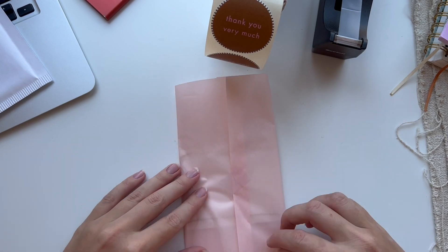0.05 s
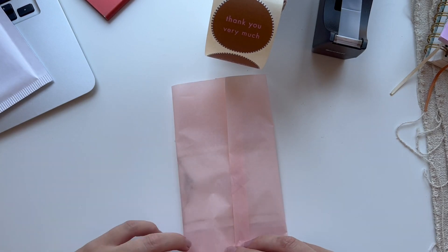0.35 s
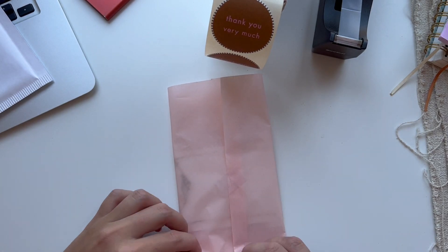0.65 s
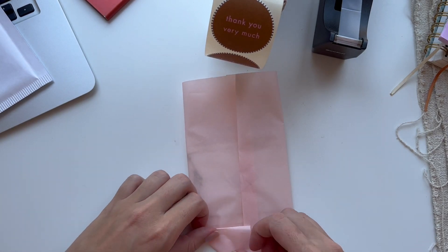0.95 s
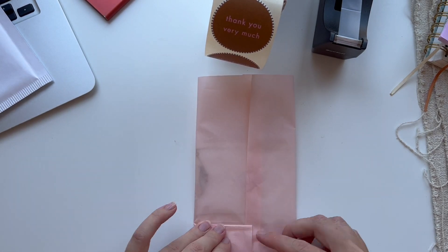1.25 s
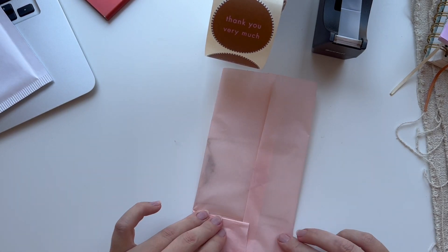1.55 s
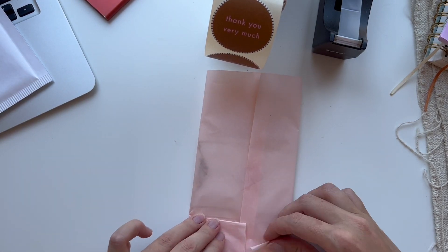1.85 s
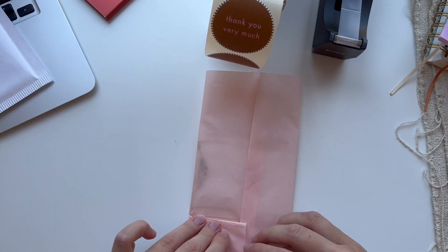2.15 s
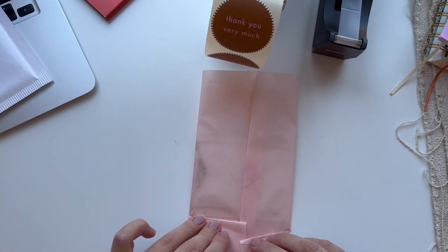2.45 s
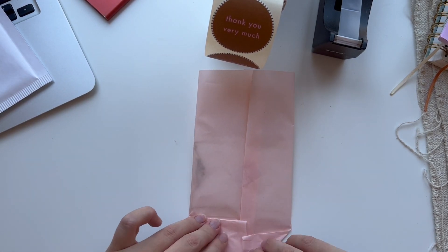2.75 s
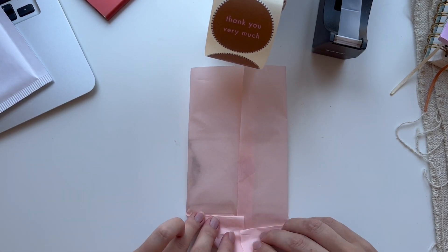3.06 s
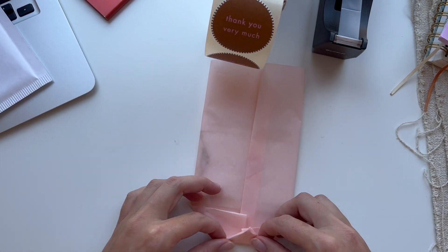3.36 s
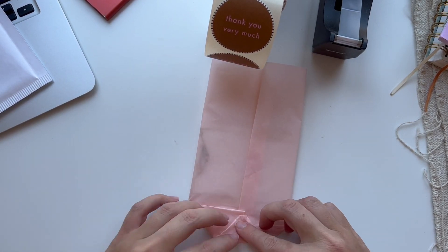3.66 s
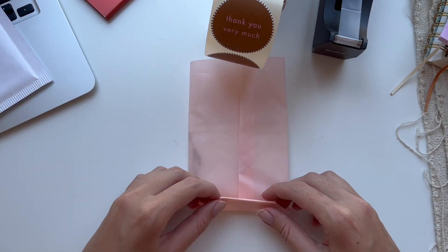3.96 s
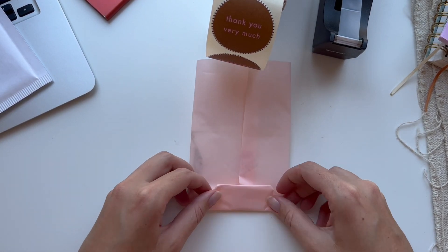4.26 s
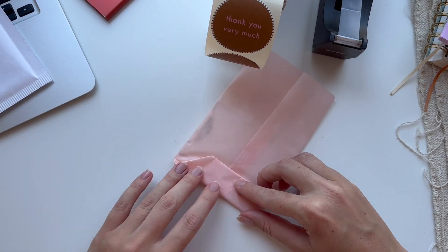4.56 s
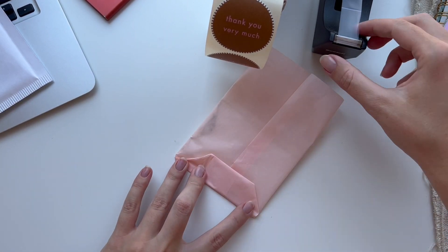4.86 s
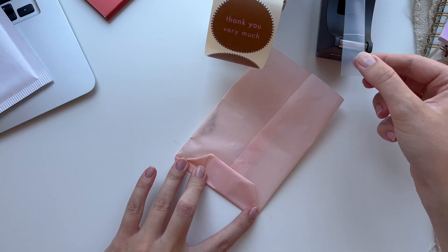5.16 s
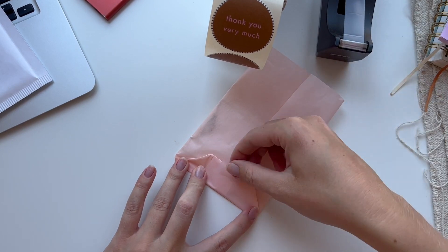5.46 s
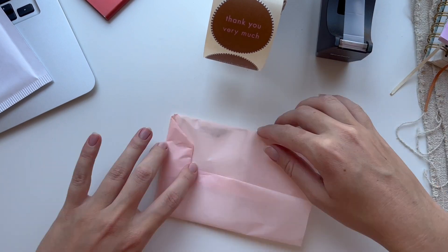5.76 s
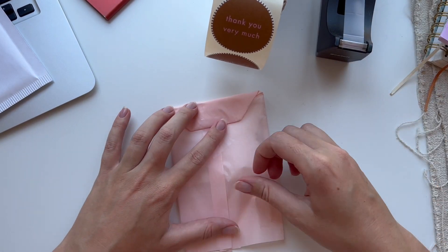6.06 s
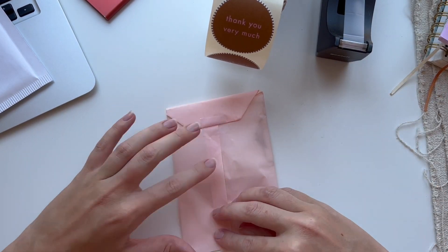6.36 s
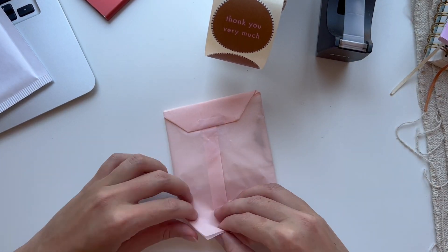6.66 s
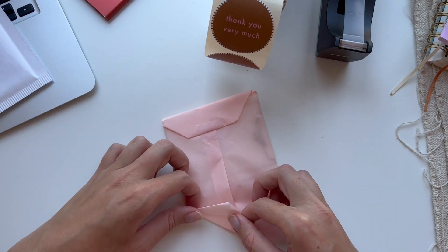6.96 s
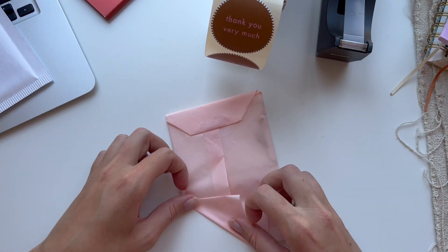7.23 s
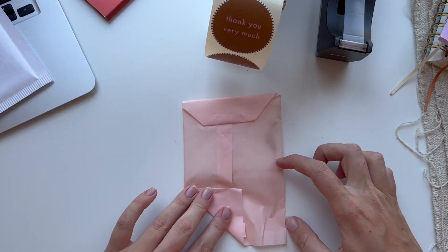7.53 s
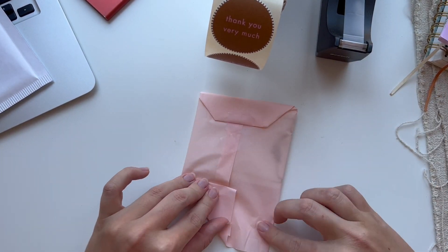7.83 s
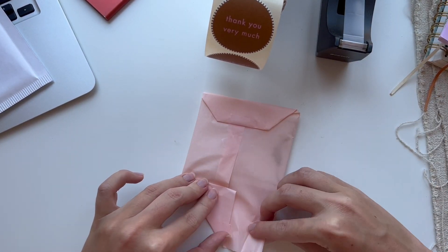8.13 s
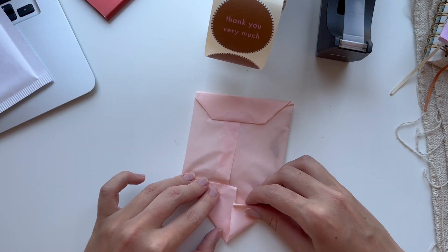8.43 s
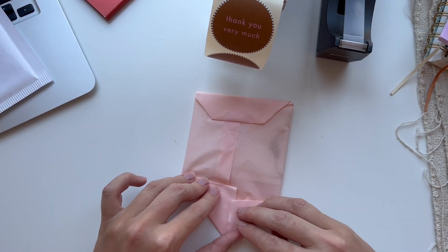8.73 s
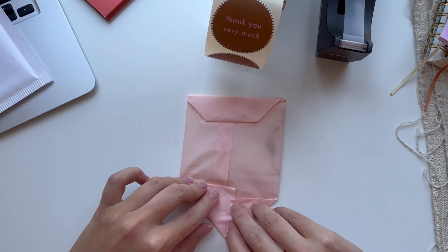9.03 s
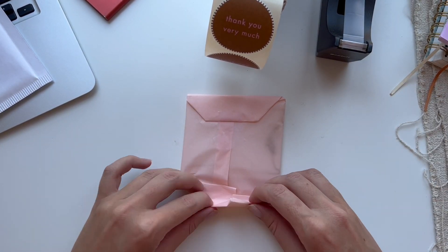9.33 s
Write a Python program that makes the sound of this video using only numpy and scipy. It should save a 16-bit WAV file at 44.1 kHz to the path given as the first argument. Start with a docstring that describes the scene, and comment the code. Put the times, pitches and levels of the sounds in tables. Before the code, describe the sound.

Thin tissue paper rustles, crinkles and snaps as it is folded on a desk, with a few dull bumps over a low hum.

```python
"""Hands fold and crease thin tissue paper on a desk in a small room filled with a low, throbbing hum.
From the start the sheet hisses by friction, and crackles, snaps and ticks as it buckles. The desk is
scuffed at 0.7 s and bumped at 1.3 s, when something hollow rocks on it. From 2.4 s a sliding finger
rasps now and then. Just after 5 s tape peels off its roll and is torn on a ringing cutter. The folding
goes on to the end, with its loudest snaps and more bumps and ringing scuffs between 6.7 and 8 s."""
import sys
import numpy as np
from scipy import signal
from scipy.fft import rfft, irfft, next_fast_len
from scipy.io import wavfile
from scipy.ndimage import uniform_filter1d

SR = 44100
rng = np.random.default_rng(int(sys.argv[2]) if len(sys.argv) > 2 else 0)


def generate_wav(signal):
    """Clip the signal to [-1, 1] and save it as 16-bit WAV at the path in sys.argv[1]."""
    frames = np.transpose(np.atleast_2d(signal))
    scaled = np.clip(frames, -1, 1) * 32767
    pcm = np.round(scaled).astype(np.int16)
    wavfile.write(sys.argv[1], SR, pcm)


N = 418509
TIME = np.arange(N) / SR
BAND_LIMIT_HZ = 15900


def amp(db):
    """Converts decibels to an amplitude ratio."""
    return 10 ** (np.asarray(db) / 20)


def unit(x):
    """Normalises to rms 1."""
    return x / np.sqrt(np.mean(x ** 2) + 1e-20)


def peak_unit(x):
    """Normalises each channel so that its loudest 2 ms have rms 1."""
    return x / np.sqrt(uniform_filter1d(x ** 2, size=88).max(axis=1, keepdims=True))


def at_hz(points, hz):
    """Interpolates a table on a log-frequency axis."""
    knots_hz, values = np.transpose(points)
    return np.interp(np.log(hz + 1), np.log(knots_hz + 1), values)


def envelope(points):
    """Amplitude at every sample, from points of (time [s], level [dB])."""
    return amp(np.interp(TIME, *np.transpose(points)))


def add(mix, start, sound):
    """Superposes a sound on the mix from a start time in seconds."""
    part = mix[:, max(round(start * SR), 0):][:, :sound.shape[-1]]
    part += sound[..., :part.shape[1]]


def filtered(x, response):
    """Multiplies the spectrum of x by a frequency response."""
    size = next_fast_len(x.shape[-1] + 256)
    return irfft(rfft(x, size) * response(np.fft.rfftfreq(size, 1 / SR)), size)[..., :x.shape[-1]]


def coloured(x, spectrum):
    """Filters x by a tabulated spectrum and normalises to rms 1."""
    return unit(filtered(x, lambda hz: amp(at_hz(spectrum, hz))))


def drift(rate_hz):
    """Low-pass Gaussian noise: a random fluctuation of rms 1."""
    clock = TIME[::SR // 2000]
    hz = np.fft.rfftfreq(len(clock), clock[1])
    slow = irfft(rfft(rng.standard_normal(len(clock))) * np.exp(-(hz / rate_hz) ** 2), len(clock))
    return np.interp(TIME, clock, unit(slow))


def stroke(clock, start, length, db, rise_s, sag_db, release_s):
    """Envelope of one hand movement: linear attack, sagging hold, exponential release."""
    t = clock - start
    attack = np.clip(t / min(rise_s, length), 0, 1)
    hold = amp(db - sag_db * np.clip(t / length, 0, 1))
    return attack * hold * np.exp(-np.clip((t - length) / release_s, 0, 20))


# Slow swell of the hum: (time [s], level [dB])
HUM_LEVEL = [(0.0, -30), (0.21, -29.5), (0.37, -43.5), (0.79, -24), (0.9, -40), (1.4, -28), (1.45, -39.5),
             (1.77, -30), (1.88, -49), (2.01, -27), (2.56, -29.5), (2.7, -48), (2.72, -37), (3.01, -42),
             (3.09, -27), (3.44, -37.5), (3.52, -25), (3.57, -35), (4.28, -38.5), (4.65, -31.5),
             (4.76, -42.5), (4.97, -26), (5.02, -37), (5.2, -28.5), (5.34, -34.5), (6.08, -29.5),
             (6.37, -52), (6.45, -29), (6.63, -42.5), (6.82, -33.5), (8.38, -33.5), (8.72, -44.5),
             (8.83, -29), (9.06, -38.5), (9.22, -27), (9.49, -50)]
# Spectrum of the steady room noise: (frequency [Hz], relative level [dB])
ROOM_NOISE = [(15, -30), (30, -7.5), (48, 3.5), (80, 3.5), (95, -1), (112, 7.5), (128, -2.5), (165, -1.5),
              (200, -7), (280, -9), (500, -12), (900, -19.5), (3000, -36), (16000, -53)]


def hum(pitch_hz=64.04, throb_hz=7.3, flutter_hz=12):
    """Narrow-band noise: rumble in one low resonance wavers in amplitude and phase, over room noise."""
    throb = drift(throb_hz) + 1j * drift(throb_hz)
    throb += amp(-14) * (drift(flutter_hz) + 1j * drift(flutter_hz))
    throb /= (1 + abs(throb) ** 2) ** 0.47  # the strongest throbs level off
    tone = unit((throb * np.exp(2j * np.pi * pitch_hz * TIME)).real)
    return envelope(HUM_LEVEL) * tone + amp(-41) * coloured(rng.standard_normal((2, N)), ROOM_NOISE)


# Fingers keep the sheet gently moving: (start [s], duration [s], level [dB], treble tilt [dB])
GENTLE_HOLDS = [(0, 0.3, -44.5, -6.5), (0.385, 0.9, -47, -7), (1.37, 0.15, -58, -12),
                (1.68, 0.32, -52, -7.5), (2.063, 0.46, -51, -7), (2.722, 0.06, -53.5, -6),
                (2.938, 0.37, -48.5, -8.5), (3.387, 1.22, -49.5, -7.5), (4.653, 0.11, -47.5, -12),
                (4.904, 0.044, -47, -10), (5.259, 0.033, -44, -8), (5.491, 0.56, -45, -11),
                (6.124, 0.32, -47, -7.5), (6.548, 0.062, -45.5, -6), (6.679, 0.56, -46.5, -8),
                (7.324, 0.4, -52, -9), (7.985, 0.47, -47, -10), (8.528, 0.44, -49, -5.5),
                (9.014, 0.34, -47.5, -9.5), (9.398, 0.021, -44, -6.5)]
# Pushes, dull if sliding, crisp if bending: (start [s], duration [s], level [dB], treble tilt [dB])
FOLDING_PUSHES = [(0, 0.21, -43.5, -8.5), (.443, 0.092, -41.5, -3), (.542, 0.051, -32.5, -5.5),
                  (.697, 0.092, -40.5, -6.5), (.872, 0.071, -42.5, -10), (.958, 0.039, -38.5, -2),
                  (1.037, 0.12, -38.5, -5), (1.37, 0.14, -43, -8), (1.491, .13, -41, -7.5),
                  (1.658, 0.069, -43.5, -5.5), (1.827, 0.13, -44.5, -5), (2.108, 0.048, -44.5, -1),
                  (2.225, 0.035, -43, -12), (2.3, 0.077, -44, -6), (2.385, 0.089, -39, -4.5),
                  (2.969, 0.14, -39, -7), (3.222, 0.065, -43.5, -8), (3.404, 0.053, -38, -6),
                  (3.505, 0.13, -43, -4.5), (3.82, 0.018, -34, -3), (3.868, 0.13, -43, -5),
                  (4.358, 0.07, -38.5, -6), (4.422, 0.16, -42, -11), (4.69, 0.081, -43.5, 2),
                  (5.511, 0.048, -45, -3), (5.728, .15, -36, -9), (5.913, .16, -34.5, -6),
                  (6.13, 0.15, -45, -6), (6.257, .071, -39, -5), (6.37, 0.074, -37.5, -4.5),
                  (6.672, 0.062, -36, -8), (6.78, 0.079, -37, -5.5), (6.942, 0.028, -34.5, -5),
                  (7.042, 0.014, -33.5, -2), (7.114, 0.13, -47.5, -9), (7.414, 0.092, -41, -5),
                  (7.54, .11, -36.5, -13), (7.685, 0.15, -36, -4), (7.732, 0.026, -22.5, 0.5),
                  (7.885, 0.027, -41, -3), (7.977, 0.14, -41, -4.5), (8.127, 0.18, -36.3, -4.5),
                  (8.702, 0.15, -47, -5)]
# Fingers pin the sheet and hush it at once: (start [s], duration [s])
FINGER_PINS = [(0.332, 0.048), (6.458, .078), (7.38, 0.027), (7.853, 0.035)]


def handling(rest_db=-64, rest_crisp_db=-6, pin_s=0.0032):
    """Incoherent sources add in power: gives the sheet's effort and power-weighted crispness in dB."""
    clock = TIME[::SR // 1000]
    power = np.full(len(clock), amp(rest_db) ** 2)
    weighted_crisp = power * rest_crisp_db
    hold = dict(rise_s=0.0054, sag_db=0, release_s=0.055)  # answers at once, settles slowly
    push = dict(rise_s=0.03, sag_db=2, release_s=0.011)  # builds, eases as the paper yields, stops short
    for movements, shape in (GENTLE_HOLDS, hold), (FOLDING_PUSHES, push):
        for start, length, db, crisp_db in movements:
            stroke_power = stroke(clock, start, length, db, **shape) ** 2
            power += stroke_power
            weighted_crisp += stroke_power * crisp_db
    pinned = sum(np.clip(np.minimum(clock - start, start + length - clock) / pin_s, 0, 1)
                 for start, length in FINGER_PINS)
    effort_db = (1 - pinned) * 10 * np.log10(power) + pinned * rest_db
    return np.interp(TIME, clock, effort_db), np.interp(TIME, clock, weighted_crisp / power)


def grains(per_s, spread_db, clump_db, ring_s):
    """Shot noise: the power of tiny random impulses, clumped in size, with a running mean near 1."""
    sizes = amp(spread_db * np.minimum(rng.exponential(1, N), 5) + clump_db * drift(115))
    sizes *= rng.random(N) < per_s / SR
    t = TIME[:SR // 50]
    power = abs(signal.oaconvolve(sizes ** 2, t * np.exp(-2 * t / ring_s))[:N]) + 1e-12
    return power / uniform_filter1d(power, size=2400)


# Spectrum radiated by the sheet: (frequency [Hz], relative level [dB])
PAPER_SPECTRUM = [(100, -34), (400, -4.5), (800, -4), (1300, -2), (1800, -1), (2450, -0.5), (3200, -1),
                  (5500, 0.5), (8000, 1), (9500, 2.5), (10500, -1), (11600, 7.5), (13000, 2.5), (16000, 0)]


def paper_gain(hz, treble_db):
    """Spectral tilt at constant power: a crisper sheet radiates more of its sound as treble."""
    tilt_db = treble_db * np.interp(hz, [3000, 6000, 11500], [-.12, 0, 1])
    gain = amp(at_hz(PAPER_SPECTRUM, hz) + tilt_db) * (hz < BAND_LIMIT_HZ + 500)
    return gain / np.sqrt(np.mean(gain ** 2, axis=-1, keepdims=True))


def sheet(power, crisp_db, patchy_db, shape_db=2.0):
    """Source and filter: the paper colours noise differently with each buckle and shape of the sheet."""
    hz, t, spectra = signal.stft(np.sqrt(power) * rng.standard_normal((2, N)), SR, nperseg=128)
    patches = uniform_filter1d(rng.standard_normal(spectra.shape[1:]), size=3, axis=0)
    patches = unit(uniform_filter1d(patches, size=9, axis=1))
    shape = unit(uniform_filter1d(rng.standard_normal(spectra.shape[1:]), size=60, axis=1))
    colour = paper_gain(hz, np.interp(t, TIME, crisp_db)[:, None]).T
    colour *= amp(patchy_db * patches + shape_db * shape)
    return unit(signal.istft(spectra * colour, SR, nperseg=128)[1][:, :N])


def rustle(effort_db, crisp_db):
    """Sliding friction makes a dense hiss; buckling adds crackles, more of them in a crisper sheet."""
    slips = grains(per_s=5000, spread_db=1.2, clump_db=2.13, ring_s=0.00075)
    hiss = sheet(slips, crisp_db - 1, patchy_db=2.5)
    bass_cut = lambda hz: hz / np.hypot(hz, 600)
    body_resonance = lambda hz: amp(-17.5) / (1 + ((hz - 2550) / 300) ** 2)
    hiss = unit(filtered(hiss, lambda hz: bass_cut(hz) + body_resonance(hz)))
    buckles = grains(per_s=280, spread_db=4.1, clump_db=4.4, ring_s=0.00052)
    crackle = sheet(buckles, crisp_db + 4, patchy_db=4)
    # small creases keep ticking as they relax, even when the hands nearly rest
    relaxations = rng.uniform(0.081, 1, N) ** 2 * (rng.random(N) < 20 / SR)
    tick_power = abs(signal.oaconvolve(relaxations, np.exp(-TIME[:SR // 100] / 0.00073))[:N])
    ticking = sheet(tick_power, crisp_db + 9.5, patchy_db=5) * amp(0.85 * effort_db - 16.5)
    crackle_share = np.clip(0.43 + 0.036 * crisp_db, .05, .8)
    blend = np.sqrt(1 - crackle_share) * hiss + np.sqrt(crackle_share) * crackle
    unsteady_db = drift(6.2)  # fingers never press evenly
    return blend * amp(effort_db + unsteady_db) + ticking


# The loudest snaps of creases and tape, each ringing the pocket of paper around it:
# (time [s], level [dB], treble tilt [dB], decay time [s], pocket frequency [Hz], pocket gain [dB])
LOUD_SNAPS = [(0.0512, -25.5, 0.5, 0.0016, 6800.0, 4), (0.3925, -24.5, 0, 0.00098, 8600.0, 27),
              (0.4262, -31.0, 6, 0.0023, 6500.0, 4), (0.4719, -26.5, 0, 0.003, 3400.0, 3),
              (0.5128, -24.5, 1, 0.002, 3380, 11), (0.5952, -27, 14, 0.0017, 5300.0, 1),
              (0.9949, -31, 4, 0.0014, 4800.0, 11), (1.4436, -22, -2, 0.0019, 3900.0, 5),
              (1.9273, -25.0, 2.5, 0.0011, 6800.0, 7), (2.3104, -26, -3, 0.0014, 3980, 8),
              (2.3944, -25.5, 3, 0.0016, 4500.0, 11), (2.4127, -29, 0, 0.0026, 1700.0, 13),
              (2.4265, -30, -1, .002, 1900, 9), (2.4422, -31, -1, .002, 1500, 10),
              (2.4529, -27.5, 2, 0.0014, 5500.0, 8), (2.7896, -34.5, 1.0, 0.0019, 8650, 4),
              (2.9907, -29, 2, 0.0014, 3300.0, 4), (3.0266, -26.5, 0.5, 0.0031, 4480, 6),
              (3.0384, -28, 2.0, 0.0018, 3000.0, 7), (3.0622, -28, 4.0, 0.0034, 4300.0, 2),
              (3.2646, -28.5, 7, 0.0014, 6100.0, 6), (3.2866, -32.5, -1, 0.0013, 6500.0, 9),
              (3.662, -28, 6.0, 0.00063, 5000.0, 19), (3.9589, -26.5, -4.5, 0.002, 5700.0, 2),
              (4.1442, -29, 6, 0.0046, 5500.0, 2), (4.2222, -31, -4.0, 0.0011, 3920, 15),
              (4.3742, -27.5, 2.0, 0.0015, 5400, 21), (4.5639, -31.5, 1, 0.00068, 2800.0, 12),
              (4.7318, -32.5, 0, 0.00071, 1900.0, 13.5), (5.2632, -22.5, 13, 0.00077, 3900.0, 8),
              (5.3287, -32.5, 1.0, 0.0035, 1900.0, 8), (5.5421, -29, 3, 0.0009, 6100.0, 8),
              (5.6317, -31.5, -4, 0.0011, 6300.0, 10), (5.9711, -20, -3, 0.0045, 2300.0, 0),
              (6.0625, -26, 7, 0.0006, 6100.0, 11), (6.1531, -30, -3.5, 0.00099, 2300.0, 6),
              (6.2267, -31, -2, 0.00072, 2520, 15), (6.2946, -27.0, 5, 0.0013, 5900.0, 12),
              (6.3984, -24.5, 2, 0.0015, 5730, 12), (6.7117, -17.2, 8, 0.0012, 3550, 13.5),
              (6.8122, -27, 1, 0.001, 2600.0, 15), (7.122, -37, -2, .001, 2500, 10),
              (7.1473, -27.5, -2, 0.0019, 2660, 5), (7.2266, -30.5, 1, 0.0025, 2300.0, 0),
              (7.234, -35, 1, .0015, 2200, 6), (7.6323, -15.5, 8, 0.00074, 7500.0, 7),
              (7.7696, -27, 3, 0.0016, 1900.0, 1), (7.8324, -20, 21, 0.0019, 5900.0, 3.0),
              (7.887, -35.5, -3, 0.0034, 1290, 8), (7.9116, -29, 7, 0.0007, 2500.0, 3),
              (8.0494, -28.5, -1.0, 0.0007, 7200.0, 10), (8.2368, -26, 8, 0.0018, 6100.0, 15),
              (8.2952, -27.5, 2, 0.0017, 5950, 11), (8.344, -25.5, 2, 0.0017, 4520, 11),
              (8.3975, -27.0, 2, 0.0019, 3870, 10.0), (8.4702, -25, 4, 0.0004, 2880, 7),
              (8.537, -32, 3.0, 0.0015, 5910, 25), (8.728, -27, 6.5, 0.0013, 2900.0, 12),
              (8.891, -27, 2, 0.0007, 6480, 22), (9.1807, -30.5, -4, 0.0039, 2400.0, 13)]


def snaps(rows, rise_s=0.00047, spike_s=0.0001, flutter_s=0.015, relative_bandwidth=0.2):
    """Snap-through buckling: a crease gives way with a spike that excites a resonant pocket of paper."""
    out, t = np.zeros((2, N)), TIME[:2048]
    spike = np.exp(-((t - rise_s) / spike_s) ** 2)
    attack = 1 - np.exp(-(t / rise_s) ** 2)
    knots_hz = np.geomspace(800, 16000, num=22)
    for start, db, treble_db, ring_s, pocket_hz, lift_db in rows:
        ring = attack * (np.exp(-t / ring_s) + amp(-19) * np.exp(-t / flutter_s))
        shape = ring + amp(-2 + 0.29 * treble_db) * spike  # crisper snaps are sharper
        ripple = np.column_stack([knots_hz, 2 * rng.standard_normal(len(knots_hz))])
        pocket = lambda hz: 1 + (amp(lift_db) - 1) / (1 + 2j * (hz / pocket_hz - 1) / relative_bandwidth)
        burst = shape * rng.standard_normal((2, len(t)))
        crack = filtered(burst, lambda hz: paper_gain(hz, treble_db) * amp(at_hz(ripple, hz)) * pocket(hz))
        add(out, start, amp(db) * peak_unit(crack))
    return out


def small_snaps(effort_db, per_s=5, still_db=-53.5, usual_db=-42.5):
    """A Poisson process: lesser snaps occur while the sheet moves, louder the harder it is worked."""
    onsets = np.flatnonzero((rng.random(N) < per_s / SR) & (effort_db > still_db))
    levels_db = -37 + 0.47 * (effort_db[onsets] - usual_db)
    pockets_hz = 4440 * 2 ** (rng.standard_normal(len(onsets)) / 2)
    treble_db, ring_s, lift_db = 4, 0.0016, 8
    return snaps([(start, db, treble_db, ring_s, hz, lift_db)
                  for start, db, hz in zip(onsets / SR, levels_db, pockets_hz)])


# Tiny facets of the sheet flipping over: (time [s], level [dB])
FACET_FLIPS = [(.1368, -31), (.313, -35), (.6605, -28.5), (.773, -32), (.970, -35), (1.102, -23.5),
               (1.245, -41), (1.537, -32), (1.620, -31), (1.837, -36), (2.1277, -34), (2.2675, -31),
               (2.726, -40), (2.912, -39), (2.942, -36), (3.136, -36), (3.3835, -34), (3.4175, -36),
               (3.4925, -39), (3.5367, -35), (3.689, -35), (3.7544, -34), (3.825, -30), (3.8433, -35),
               (4.102, -33), (4.9135, -41), (6.366, -32), (6.386, -30), (6.8604, -32), (7.436, -37),
               (7.6912, -27.5), (7.819, -32), (8.073, -29), (8.562, -37), (8.8123, -33), (8.8747, -32.5),
               (8.957, -34), (9.124, -36), (9.1402, -31), (9.2063, -31)]


def ticks(rise_s=0.00023, decay_s=0.00079):
    """A broadband transient: a facet flips over in a thin, dry burst, with no pocket to resonate."""
    out, t = np.zeros((2, N)), TIME[:SR // 50]
    shape = np.interp(t, [0, rise_s], [0, 1]) * np.exp(-t / decay_s)
    for start, db in FACET_FLIPS:
        burst = shape * rng.standard_normal((2, len(t)))
        tick = filtered(burst, lambda hz: paper_gain(hz, treble_db=3.5))
        add(out, start, amp(db) * peak_unit(tick))
    return out


# Scuffs across the desk:
# (start [s], duration [s], level [dB], first pressure [0-1], last pressure [0-1], tuning [ratio])
DESK_SCUFFS = [(0.708, 0.046, -39, 0.2, 0.11, 0.99), (1.346, 0.081, -32.5, 0.52, 0.25, 0.92),
               (2.739, .08, -40, 1, 1, 1.0), (7.498, 0.13, -35.5, 0.77, 0.12, 0.99),
               (7.884, 0.13, -35, 0.53, 0.25, 0.98)]
# Resonances of a light scuff: (frequency before tuning [Hz], bandwidth [Hz], relative level [dB])
SCUFF_MODES = [(634, 430, 3), (1224, 90, 9), (1530, 550, -0.5), (1880, 260, -3), (2730, 160, -2.5),
               (3100, 340, -16), (4370, 350, -37)]
# Spectrum of a heavy drag: (frequency [Hz], relative level [dB])
DRAG_SPECTRUM = [(80, -19), (170, -12), (270, 3.5), (400, -10.5), (650, -9.5), (1000, -22.5), (3000, -56)]


def scuffs():
    """Friction noise on the desk: heavy pressure gives a low drag, light pressure a resonant hiss."""
    out, t = np.zeros((2, N)), TIME[:SR // 4]
    for start, length, db, first, last, tuning in DESK_SCUFFS:
        pressure = np.interp(t, [0, length], [first, last])
        slips = rng.standard_normal((2, len(t)))
        slips *= 1 + 2 * (rng.random(len(t)) < .04)  # rough contact: some slips are larger
        ring = filtered(slips, lambda hz: sum(amp(level) / (1 + 2j * (hz - tuning * mode_hz) / width)
                                              for mode_hz, width, level in SCUFF_MODES))
        gain = stroke(t, 0, length, db, rise_s=0.0024, sag_db=3.5, release_s=0.012)
        add(out, start, gain * (pressure * coloured(slips, DRAG_SPECTRUM) + (1 - pressure) * unit(ring)))
    return out


# Dull bumps on the desk: (time [s], peak level [dB], contact time [s])
DESK_BUMPS = [(1.313, -25.5, 0.0021), (2.736, -18.5, 0.0026), (2.76, -31, 0.002), (2.798, -26.5, 0.0037),
              (5.096, -24, 0.0059), (5.104, -27, 0.0078), (7.502, -31, 0.0031), (7.889, -29, 0.0015)]
# Modes of the desk top: (nominal frequency [Hz], relative level [dB], T60 [s])
DESK_MODES = [(148, 3.5, 0.09), (230, -6, 0.15), (272, 4, 0.076), (353, -2.5, 0.11), (395, -1, 0.28),
              (564, 11, 0.068), (666, -12, .04)]


def bumps():
    """Modal response to a soft force pulse: the longer the contact, the less the high modes ring."""
    out, t = np.zeros((2, N)), TIME[:SR // 4]
    for start, db, contact_s in DESK_BUMPS:
        ring = sum(amp(level - 60 * t / t60) * np.cos(2 * np.pi * hz * rng.uniform(0.892, 1.046) * t)
                   for hz, level, t60 in DESK_MODES)
        force = np.sin(np.pi * np.minimum(t / contact_s, 1)) ** 2
        thud = signal.fftconvolve(ring, force)[:len(t)]
        add(out, start, amp(db) * thud / abs(thud).max())
    return out


# Modes of a hollow object: (settled frequency [Hz], relative level [dB], T60 [s])
HOLLOW_MODES = [(217.4, -0.5, 0.34), (425, -0.5, 0.27), (651, -0.5, 0.12)]


def hollow_knock(start_s=1.338, settle_s=0.0084, rattle_hz=90):
    """Damped vibration: something hollow rocks against the desk and rings until a hand stops it."""
    out, t = np.zeros((2, N)), TIME[:SR // 4]
    clock = np.cumsum(1 + 0.16 * np.exp(-t / settle_s)) / SR  # the ring starts sharp and settles
    ring = np.zeros(len(t))
    for hz, db, t60 in HOLLOW_MODES:
        mode = amp(db - 60 * t / t60) * np.sin(2 * np.pi * (hz * clock + rng.random()))
        ring += mode * (1 + 0.43 * drift(rattle_hz)[:len(t)])  # loose contact makes each mode flutter
    add(out, start_s, ring * stroke(t, 0, length=0.07, db=-21.5, rise_s=0.014, sag_db=0, release_s=0.012))
    return out


# Resonant rasps of a finger on the paper, and the ring of scuffs on the desk:
# (start [s], duration [s], level [dB], first frequency [Hz], last frequency [Hz], bandwidth [Hz])
RESONANT_RASPS = [(2.411, 0.033, -42.5, 1400, 1700, 500), (4.275, 0.11, -51.5, 2330, 2440, 200),
                  (4.373, 0.058, -38.5, 5500, 5250, 900), (4.402, 0.17, -54, 2400, 2700, 380),
                  (4.548, 0.026, -43, 2850, 2730, 250), (5.745, 0.23, -45.5, 2550, 2650, 300),
                  (5.926, .15, -42, 2600, 2650, 320), (7.549, 0.051, -37.5, 2010, 1890, 140),
                  (7.58, .07, -37.5, 1223, 1230, 50), (7.74, 0.033, -34, 1380, 1730, 220),
                  (7.921, 0.073, -40, 1210, 1290, 90)]


def rasps(slips_per_s=900):
    """Stick-slip friction: a contact on paper or desk catches and slips, driving a gliding resonance."""
    out, t = np.zeros((2, N)), TIME[:SR // 4]
    for start, length, db, first_hz, last_hz, width_hz in RESONANT_RASPS:
        slips = rng.standard_normal((2, len(t))) * (rng.random(len(t)) < slips_per_s / SR)
        centre_hz = np.interp(t, [0, length], [first_hz, last_hz])
        carrier = np.exp(2j * np.pi * np.cumsum(centre_hz) / SR)
        pole = np.exp(-np.pi * width_hz / SR)
        ring = (carrier * signal.lfilter([1 - pole], [1, -pole], slips / carrier)).real
        add(out, start, unit(ring) * stroke(t, 0, length, db, rise_s=0.0093, sag_db=7, release_s=0.011))
    return out


# Tape peeling off its roll: (time [s], level [dB])
PEEL_LEVEL = [(5.05, -61), (5.085, -43.5), (5.15, -46.5), (5.22, -48), (5.255, -63)]
# Spectrum of the peeling: (frequency [Hz], relative level [dB])
PEEL_SPECTRUM = [(200, -12), (1000, -2), (1400, 6), (1800, 6), (2400, 3), (3900, 3.5), (7000, -2.5),
                 (12000, -1), (16000, 0)]
# Modes of the tape cutter: (frequency [Hz], level [dB], T60 [s])
CUTTER_MODES = [(1360, -33, 0.016), (3980, -26, 0.012), (4320, -29, .011)]


def tape(tear_s=5.263):
    """Adhesive failure: glue lets go in a dense, even rasp; tearing the strip off rings the cutter."""
    releases = grains(per_s=1800, spread_db=1.0, clump_db=0.8, ring_s=0.0012)
    rasp = coloured(np.sqrt(releases) * rng.standard_normal((2, N)), PEEL_SPECTRUM)
    peeling = (TIME > PEEL_LEVEL[0][0]) & (TIME < PEEL_LEVEL[-1][0])
    out = rasp * envelope(PEEL_LEVEL) * peeling
    t = TIME[:SR // 10]
    cutter = sum(amp(db - 60 * t / t60) * np.sin(2 * np.pi * hz * t) for hz, db, t60 in CUTTER_MODES)
    add(out, tear_s, cutter)
    return out


# Reverberation time of the room: (frequency [Hz], T60 [s])
REVERB_TIMES = [(200, 0.16), (1000, 0.15), (4000, 0.16), (9000, 0.024), (16000, 0.069)]


def room(x, reflections_per_s=3000):
    """Reverberation: sparse reflections decay exponentially, each band at its own rate."""
    taps = rng.standard_normal((2, SR // 2)) * (rng.random((2, SR // 2)) < reflections_per_s / SR)
    taps[:, :SR // 250] = 0  # no reflection arrives in the first 4 ms
    hz, t, spectra = signal.stft(taps, SR, nperseg=256)
    decay = amp(-60 * t / at_hz(REVERB_TIMES, hz)[:, None])
    tail = signal.istft(spectra * decay, SR, nperseg=256)[1]
    return signal.oaconvolve(x, tail / np.linalg.norm(tail, axis=1, keepdims=True), axes=1)[:, :N]


# Likeness of the two channels: (frequency [Hz], coherence [ratio, clipped to 0-1 in use])
COHERENCE = [(60, 1), (150, 0.94), (300, 0.6), (700, -0.11), (1500, 0.34), (2800, 0.58), (4500, 0.4),
             (5800, 0), (7500, 0.72), (10000, 1.08), (12000, 0.46), (13500, 1.5), (16000, 7)]
# Phase difference between them: (frequency [Hz], lead of left [rad])
PHASE_LEAD = [(300, 0), (1400, -.4), (2100, .1), (3500, 1.4), (5000, 1), (7000, 0), (8200, -1.2),
              (9300, -2.9), (10400, -3.2), (11700, -4.5), (13000, -6.1), (14000, -6.45), (15800, -8.6)]
# Level difference between them: (frequency [Hz], left minus right [dB])
LEVEL_DIFFERENCE = [(100, 0.5), (300, 1), (700, 1), (2400, 1), (5400, 4.5), (7500, 2.5), (9300, -1),
                    (16000, 0)]


def stereo_pair(pair):
    """Partial coherence: two receivers share part of the sound, shifted in phase and level."""
    shared = lambda hz: np.clip(at_hz(COHERENCE, hz), 0, 1)
    left_gain = lambda hz: amp(at_hz(LEVEL_DIFFERENCE, hz) / 2)
    left = filtered(pair[0], left_gain)
    right = filtered(pair[0], shared) + filtered(pair[1], lambda hz: np.sqrt(1 - shared(hz) ** 2))
    right = filtered(right, lambda hz: np.exp(-1j * at_hz(PHASE_LEAD, hz)) / left_gain(hz))
    return np.array([left, right])


def scene(echo_s=0.0084):
    """Superposition: hum, desk and handwork add to the reverberation and a nearby surface's echo."""
    background = hum()
    effort_db, crisp_db = handling()
    desk = bumps() + hollow_knock() + scuffs()
    handwork = rustle(effort_db, crisp_db) + tape() + rasps() + ticks()
    handwork += snaps(LOUD_SNAPS) + small_snaps(effort_db)
    echo = amp(-16) * filtered(handwork, lambda hz: np.exp(-2j * np.pi * hz * echo_s))
    reverberation = amp(-19) * room(handwork) + amp(-7.5) * room(desk)
    return stereo_pair(background + handwork + desk + echo + reverberation)


def record(dry):
    """Band limiting: a linear-phase low-pass filter removes the highest treble."""
    lowpass = signal.firwin(255, BAND_LIMIT_HZ, window=("kaiser", 9), fs=SR)
    return signal.oaconvolve(dry, lowpass[None], "same")


dry = scene()
out = record(dry)
generate_wav(out)
```